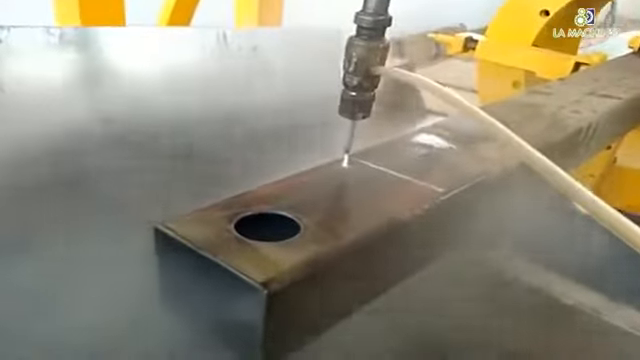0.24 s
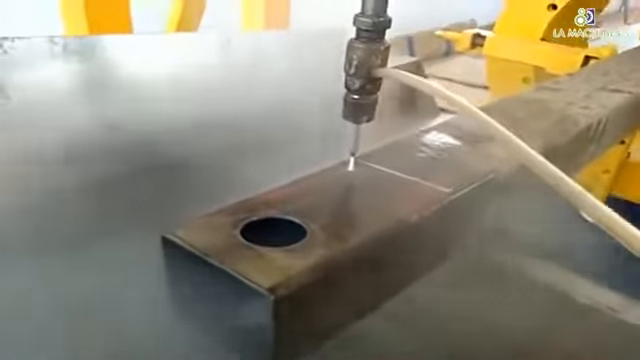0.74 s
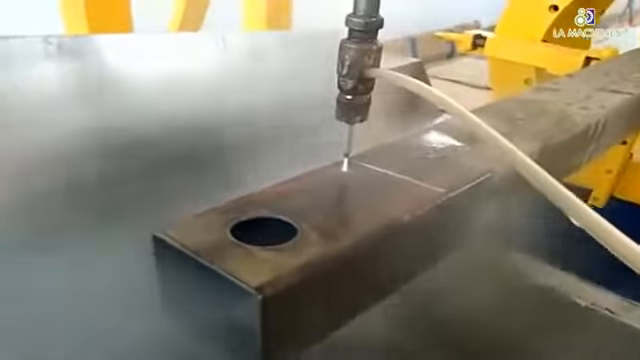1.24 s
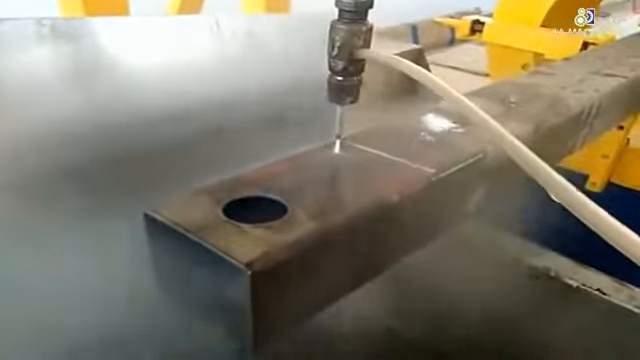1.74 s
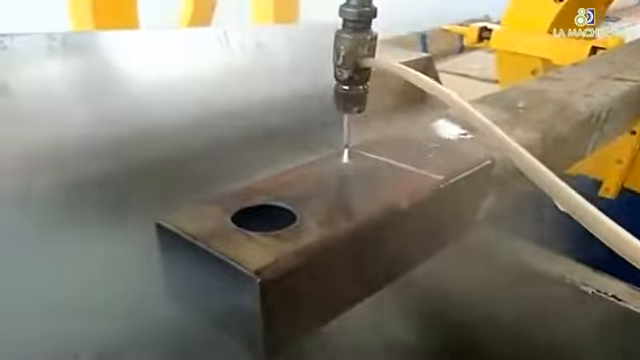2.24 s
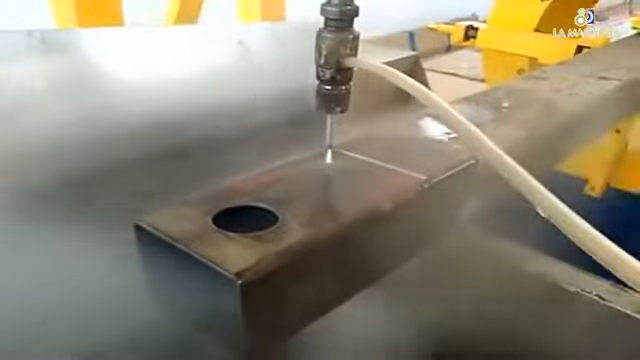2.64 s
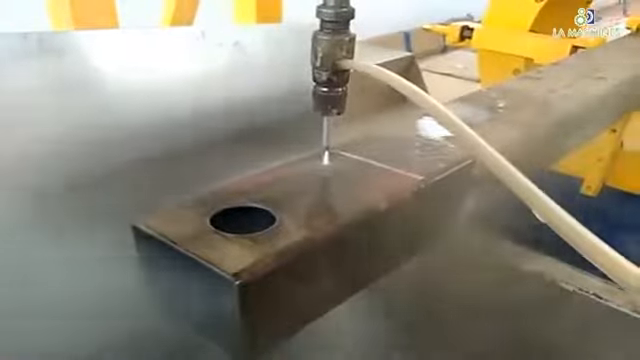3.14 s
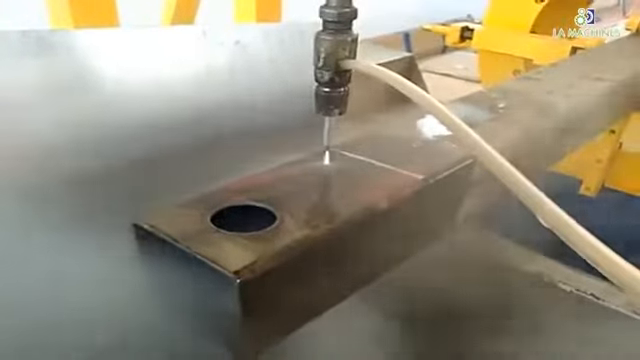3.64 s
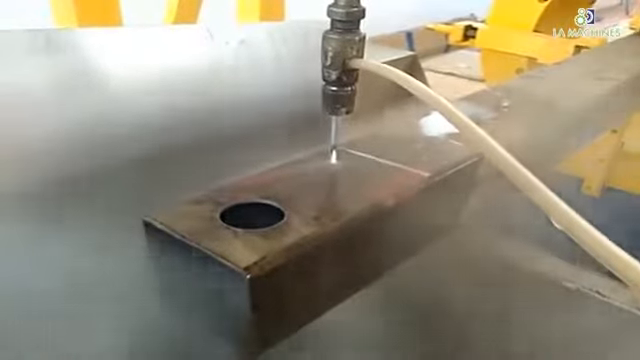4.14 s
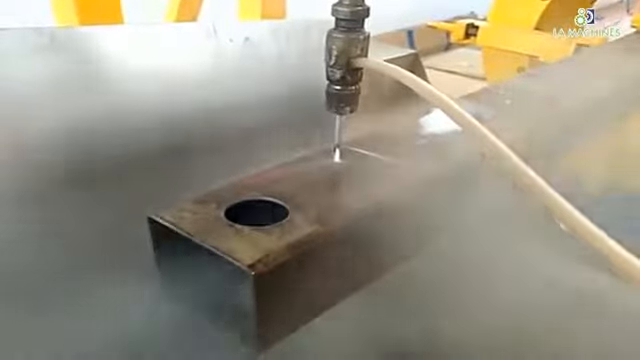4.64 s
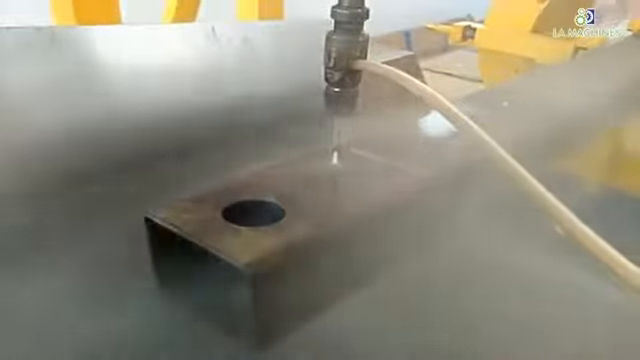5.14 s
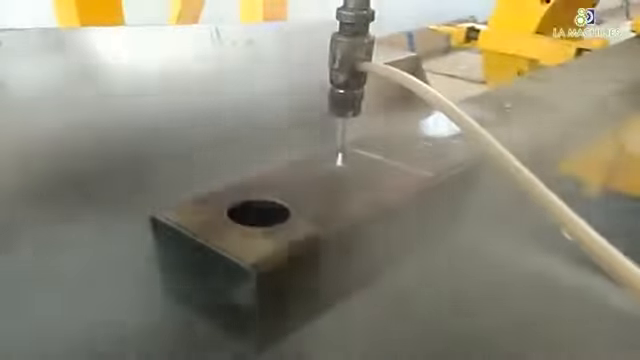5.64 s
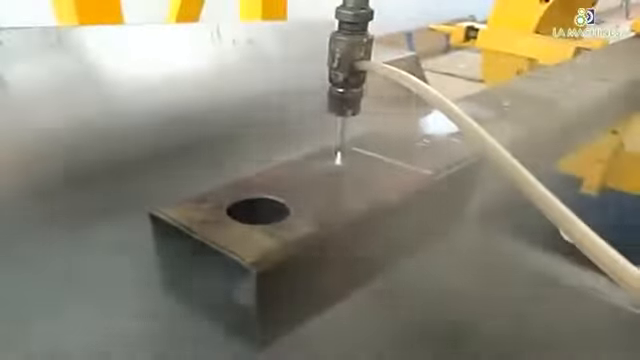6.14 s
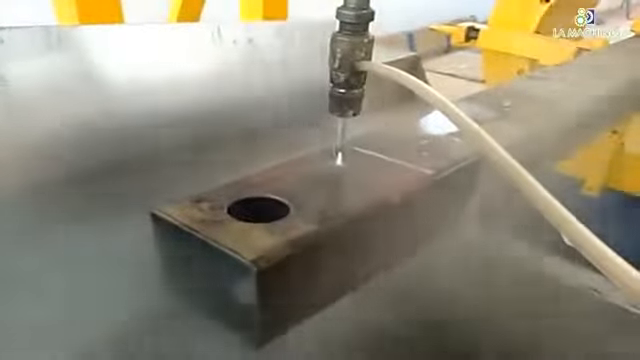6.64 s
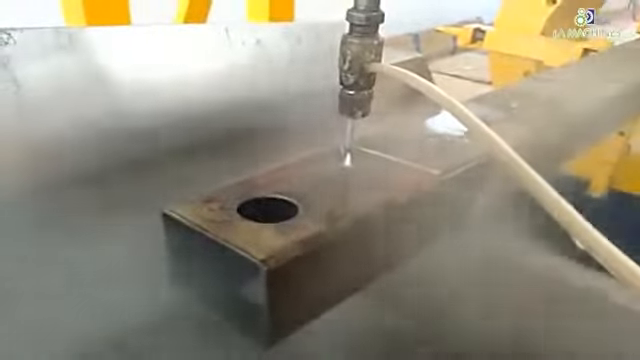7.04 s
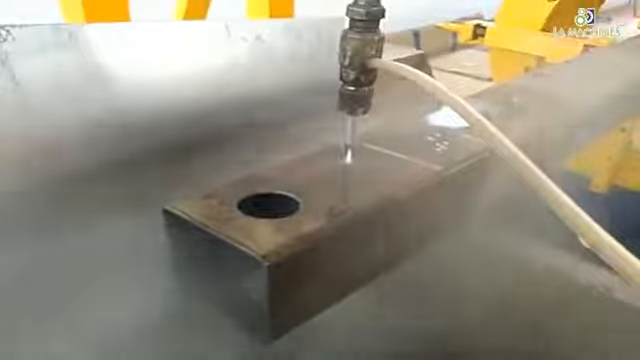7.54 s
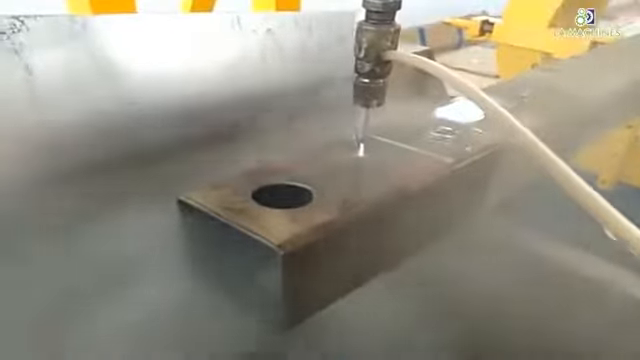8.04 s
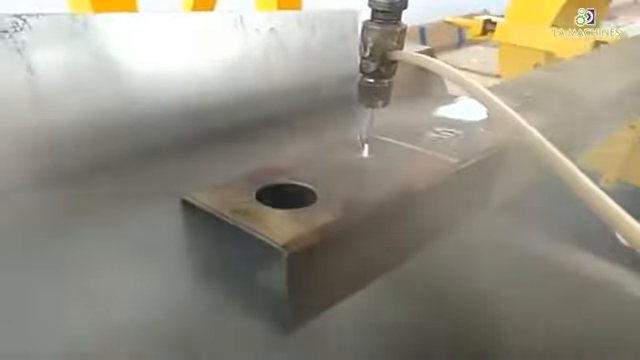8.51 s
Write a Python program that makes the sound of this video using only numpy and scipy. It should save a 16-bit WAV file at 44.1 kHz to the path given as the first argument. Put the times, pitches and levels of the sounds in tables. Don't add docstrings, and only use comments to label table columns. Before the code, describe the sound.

A high-pressure water jet hisses and roars steadily against a steel tube, which rings with shifting metallic tones, heard close up and slightly overloaded.

```python
import sys
import numpy as np
from scipy import signal
from scipy.fft import rfft, irfft, next_fast_len
from scipy.io import wavfile
from scipy.ndimage import uniform_filter1d

SR = 44100
rng = np.random.default_rng(int(sys.argv[2]) if len(sys.argv) > 2 else 0)


def store_wav(level_fs):
    pcm = np.round(np.clip(np.atleast_2d(level_fs), -1, 1) * 32767)
    wavfile.write(sys.argv[1], SR, pcm.T.astype(np.int16))


def voltage_ratio(decibels):
    exponent = np.asarray(decibels, float) / 20
    return 10 ** exponent


N = 386757


def evened(x):
    return x / np.sqrt(np.mean(x ** 2) + 1e-20)


def read(points, hz):
    point_hz, value = np.transpose(points)
    return np.interp(np.log(hz + 1), np.log(point_hz + 1), value)


def wander(shape, size):
    field = uniform_filter1d(rng.standard_normal(shape), size[0], axis=0)
    return evened(uniform_filter1d(field, size[1], axis=1))


# (pitch_hz, level_db)
PUMP_HUM = [(579, -57)]
# (time_s, level_db)
HUM_FADE = [(0, 5.5), (3, 2.5), (5.5, 3.5), (6.5, 1), (8.77, 1)]


def pump():
    pitch_drift, level_drift = wander((N, 2), size=(9000, 1)).T
    hum = np.zeros(N)
    for pitch_hz, level_db in PUMP_HUM:
        phase = 2 * np.pi * np.cumsum(pitch_hz + 1.38 * pitch_drift) / SR
        hum += voltage_ratio(level_db + 1.5 * level_drift) * np.sqrt(2) * np.sin(phase)
    return voltage_ratio(np.interp(np.arange(N) / SR, *np.transpose(HUM_FADE))) * hum


# (time_s, strength_0_to_1)
SPRAY_PUFFS = [
    (.38, 1.),
    (1.1, 0.5),
    (1.75, 0.3),
    (6.3, 0.2),
]


def spray_changes(t, hz):
    puff = sum(strength * np.exp(-((t - time_s) / 0.31) ** 2) for time_s, strength in SPRAY_PUFFS)
    roar_db = 3.0 * np.minimum(t / 4.5, 1) + 2.5 * puff
    splash_db = 2.5 * t / t[-1] - 3 * puff
    mist_db = 6.5 * np.exp(-t / 0.7) + 5.5 * puff
    roar_db, splash_db, mist_db = ((c - c.mean())[:, None] for c in (roar_db, splash_db, mist_db))
    field_db = roar_db / (1 + (hz / 2200) ** 6)
    field_db += splash_db / (1 + ((hz - 9100) / 1000) ** 6)
    field_db += mist_db / (1 + (10000 / (hz + 1)) ** 30)
    shape = len(t), len(hz)
    field_db += 0.7 * wander(shape, size=(90, 3)) / (1 + (900 / (hz + 1)) ** 2)
    field_db += 0.67 * wander(shape, size=(6, 30))
    flicker = wander((len(t), 2), size=(3, 1))
    field_db += 1.9 * flicker[:, :1] / (1 + (8300 / (hz + 1)) ** 12)
    field_db += 1.0 * flicker[:, 1:] / (1 + (hz / 2500) ** 4)
    return field_db


# (time_s, place_0_to_4 between the five mode sets)
NOZZLE_TRAVEL = [(0, 0.0), (.8, 0.1), (1.8, 1.5), (3.4, 2.5), (4.4, 2.5), (5.3, 3), (6.6, 3.5), (7.6, 3.5),
                 (8.77, 4.0)]
# (pitch_hz, width_hz, level_db)
RING_START = [(1182, 66, -17), (2020, 48, -28), (2780, 54, -13.5), (3080, 56, -10.5), (3390, 90, -16),
              (3880, 100, -12), (4260, 68, -6.5), (5130, 100, 1), (5290, 69, 2), (5500, 54, -0.5),
              (5790, 23, 0.5), (5980, 120, 0), (6360, 43, -5), (6730, 69, -6), (7200, 50, -14),
              (7740, 150, -3), (8300, 87, -18), (8460, 97, -8), (9230, 72, -13), (10600, 170, -20.5),
              (11080, 160, -25.5)]
RING_EARLY = [(1316, 59, -15.5), (2020, 55, -17), (2440, 110, -10.5), (2765, 45, -6.5), (3100, 82, -7.5),
              (3490, 170, -11.5), (4215, 55, -3.5), (5180, 72, 5.5), (5580, 42, 5), (5710, 42, -3),
              (6010, 120, 2.5), (6400, 26, -11), (6880, 70, -5), (7260, 51, -13), (7680, 61, 3),
              (8290, 110, -5.5), (8850, 72, -8), (10600, 88, -24)]
RING_MIDDLE = [(1310, 42, -19), (1630, 78, -18.5), (2020, 61, -14.5), (2520, 82, -15), (2770, 40, -13),
               (3090, 140, -11), (3550, 230, -12), (4140, 210, -12), (5080, 65, 0.5), (5770, 100, 0.5),
               (6060, 120, -2.5), (6570, 59, -3), (7720, 134, -0.5), (7930, 64, -1.5), (10500, 89, -19.5),
               (10870, 170, -21)]
RING_LATE = [(1220, 230, -19), (1590, 68, -19.5), (2320, 530, -18), (2766, 44, -5.5), (3095, 160, -11),
             (3567, 47, -10), (4140, 310, -10.5), (5177, 130, -1), (5420, 52, 1), (5740, 97, -1),
             (6090, 85, 0), (7780, 210, -4.5), (8340, 75, -7.5), (9150, 62, -15.5), (10260, 94, -26),
             (10400, 97, -19.5)]
RING_END = [(1600, 120, -19), (2058, 43, -11), (2600, 48, -15), (2750, 43, -7.5), (2907, 23, -8),
            (3570, 72, -8.5), (4025, 82, -7.5), (4380, 120, -16), (5220, 72, -3.5), (5370, 50, 2.5),
            (5684, 160, 0), (6130, 160, -6.5), (6820, 58, -4.5), (7320, 70, -3), (7710, 200, -3),
            (8460, 56, -4), (8870, 72, -13), (10230, 110, -18)]


def tube_ring(t, hz):
    stages = RING_START, RING_EARLY, RING_MIDDLE, RING_LATE, RING_END
    stage_power = []
    for modes in stages:
        power = np.zeros(len(hz))
        for pitch_hz, width_hz, level_db in modes:
            offset = 2 * (hz - pitch_hz) / max(width_hz, 45)
            power += voltage_ratio(2 * level_db) / (1 + offset ** 2) ** 2.6
        stage_power.append(power)
    place = np.clip(np.interp(t, *np.transpose(NOZZLE_TRAVEL)), 0, len(stages) - 1)[:, None]
    shares = np.maximum(1 - abs(place - np.arange(len(stages))), 0)
    return shares @ np.array(stage_power)


# (pitch_hz, level_db per Hz)
JET_NOISE = [(30, -27), (228, -26), (581, -24), (1300, -22), (1900, -22), (2600, -15.5), (4600, -15.5),
             (5050, -8.5), (5900, -6.5), (7240, -13), (7900, -10), (9150, -22.5), (11500, -36.5),
             (15000, -45)]
# (pitch_hz, level_db)
MIC_COLOUR = [(100, -1.5), (7000, 0.23), (9000, -4), (11500, -6), (15000, -8.5)]


def jet():
    hop, window = 512, 2048
    frames, hz = N // hop + 5, np.fft.rfftfreq(window, 1 / SR)
    t = np.arange(frames) * hop / SR
    jet_db, ring_db = 1, 2.5
    power = voltage_ratio(2 * (read(JET_NOISE, hz) + jet_db)) + voltage_ratio(2 * ring_db) * tube_ring(t, hz)
    power /= voltage_ratio(2 * read(MIC_COLOUR, hz))
    real, imaginary = rng.standard_normal((frames, len(hz), 2)).T
    spectrum = (real + 1j * imaginary) * (np.sqrt(power) * voltage_ratio(spray_changes(t, hz))).T
    return evened(signal.istft(spectrum, nperseg=window, noverlap=window - hop)[1][:N])


def scene():
    jet_level_db = -18
    mono = pump() + voltage_ratio(jet_level_db) * jet()
    return np.array([mono, mono])


def overload(dry):
    power_db = 10 * np.log10(uniform_filter1d(dry ** 2, size=4000, axis=1) + 1e-12)
    held = dry / voltage_ratio(0.48 * (power_db - power_db.mean()))
    ceiling, knee = 0.17, 3.5
    return held / (1 + abs(held / ceiling) ** knee) ** (1 / knee)


def microphone_colour(x):
    size = next_fast_len(N)
    gain = voltage_ratio(read(MIC_COLOUR, np.fft.rfftfreq(size, 1 / SR)))
    return irfft(rfft(x, size) * gain, size)[:, :N]


# (pitch_hz, share_of_frames)
CHANCE_SWAPS = [(8200, 0), (8300, .13), (9300, .24), (10000, .33), (11000, .31), (12000, .27), (14800, .33)]
# (time_s, low_edge_hz)
LOUD_SWAPS = [(0.029, 4220), (0.656, 4220), (1.399, 4220), (1.422, 6290), (1.445, 6290), (1.84, 6890),
              (2.304, 5680), (3.697, 5170), (4.208, 5680), (4.231, 6890), (4.765, 5170), (4.882, 6290),
              (5.16, 4650), (5.207, 5680), (5.578, 5680), (5.601, 5680), (6.252, 5680), (6.437, 5680),
              (6.623, 5680), (6.739, 6890), (6.832, 6890), (7.227, 6290), (7.691, 6890), (8.411, 6890),
              (8.434, 6890), (8.713, 5680)]
HOP, GRID, BAND = 1024, 238, 32


def swap_shares(t, hz, band):
    frames, bands = len(t), HOP // BAND
    luck = wander((frames, bands), size=(2, 3)) + 0.5 * wander((frames, bands), size=(1, 1))
    rank = luck.argsort(0).argsort(0) / frames
    chosen = rank[:, band] < read(CHANCE_SWAPS, (band + 0.5) * BAND * hz[1])
    share = 0.27 * (hz / 9000) ** 2 * chosen
    faint_swaps = [(t[-1] * np.sqrt(u), 5500 + 1500 * v) for u, v in rng.random((18, 2))]
    for swaps, span, taken in (faint_swaps, 2, 0.088), (LOUD_SWAPS, 1, 0.85):
        for time_s, low_hz in swaps:
            first = abs(t - time_s).argmin()
            high_hz = low_hz * 2 ** rng.uniform(0.2, 0.75)
            share[first:first + span, (hz > low_hz) & (hz < high_hz)] = taken
    return np.clip(share, 0, 1)


# (pitch_hz, level_db against the band's strength)
SILENCE_BAR = [(10300, -30), (11300, -8), (12000, -1), (14000, -.5), (15000, 3.5)]


def swap_noise(x):
    frames, bins = N // HOP + 2, np.arange(HOP)
    places = np.arange(2 * HOP)
    window = np.sin(np.pi * (places + 0.5) / (2 * HOP))
    waves = np.cos(np.pi / HOP * np.outer(places + (HOP + 1) / 2, bins + 0.5))
    basis = window[:, None] * waves
    padded = np.pad(x, ((0, 0), (HOP - GRID, 3 * HOP)))
    halves = padded[:, :(frames + 1) * HOP].reshape(2, -1, HOP)
    lines = np.concatenate([halves[:, :-1], halves[:, 1:]], axis=2) @ basis
    t = (GRID + np.arange(frames) * HOP) / SR
    hz, band = bins * SR / (2 * HOP), bins // BAND
    share = swap_shares(t, hz, band)
    strength = np.sqrt((lines ** 2).reshape(2, frames, -1, BAND).mean(3))[:, :, band]
    bar_db = read(SILENCE_BAR, hz) + 4 * wander((frames, HOP // BAND), size=(2, 2))[:, band]
    noise = np.sqrt(3) * rng.uniform(-1, 1, (2, frames, HOP))
    lines = np.sqrt(1 - share) * lines + np.sqrt(share) * strength * noise
    heard = abs(lines) > strength * voltage_ratio(bar_db)
    pieces = (lines * heard) @ basis.T * 2 / HOP
    joined = pieces[:, 1:, :HOP] + pieces[:, :-1, HOP:]
    joined = np.concatenate([pieces[:, :1, :HOP], joined], axis=1).reshape(2, -1)
    joined = joined[:, HOP - GRID:][:, :N]
    return np.concatenate([x[:, :GRID], joined[:, GRID:]], axis=1)


def low_pass(x):
    return signal.sosfilt(signal.butter(12, 14980, fs=SR, output="sos"), x)


def record(dry):
    coloured = microphone_colour(overload(dry))
    offset = 0.0011
    mix = swap_noise(coloured + offset)
    return low_pass(mix)


dry = scene()
out = record(dry)
store_wav(out)
```